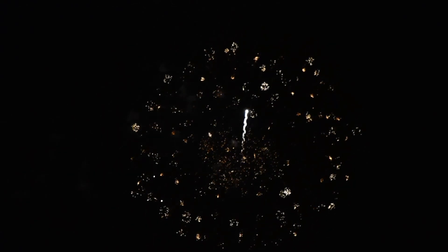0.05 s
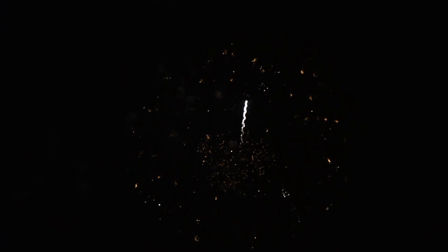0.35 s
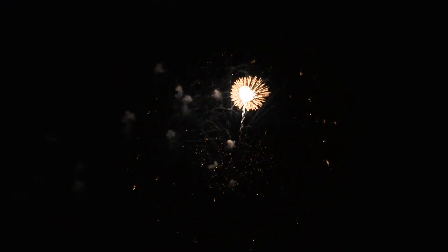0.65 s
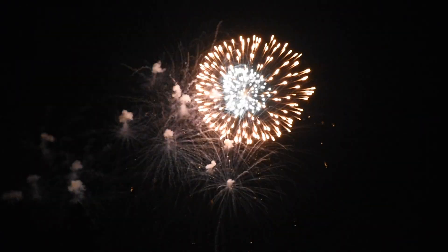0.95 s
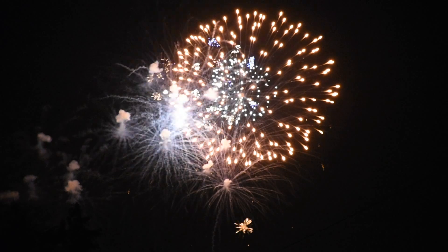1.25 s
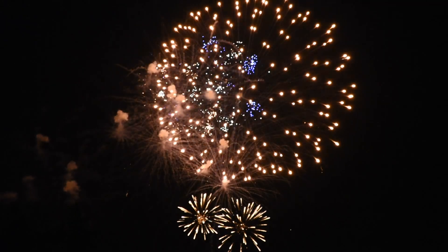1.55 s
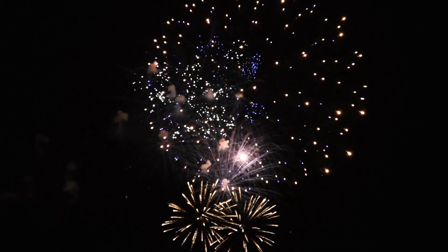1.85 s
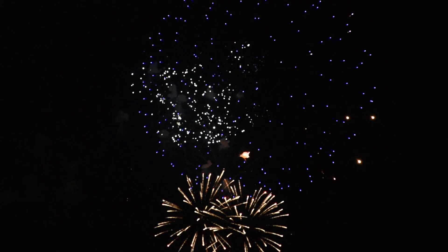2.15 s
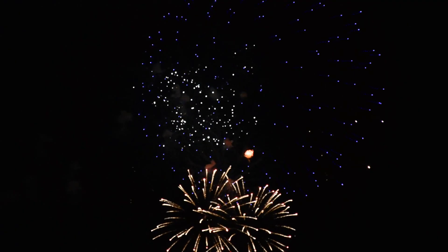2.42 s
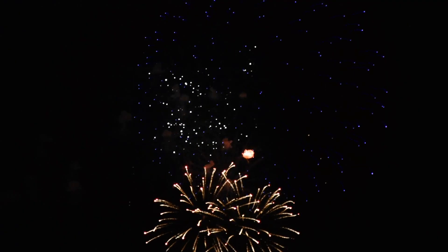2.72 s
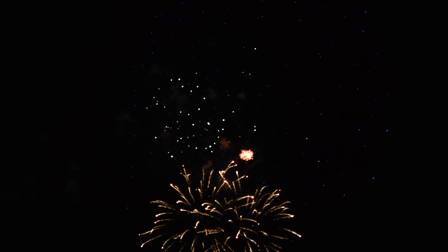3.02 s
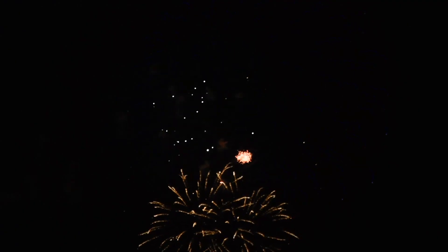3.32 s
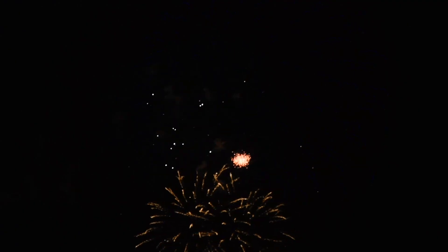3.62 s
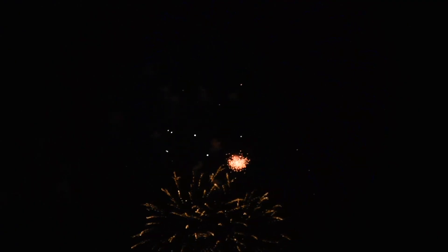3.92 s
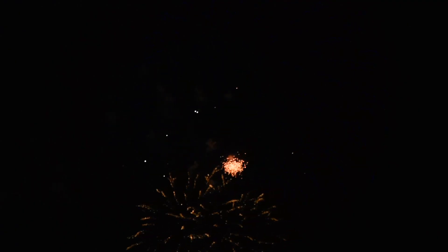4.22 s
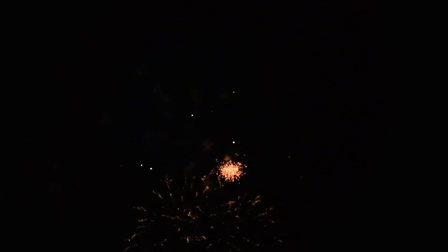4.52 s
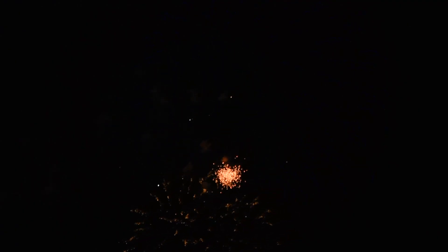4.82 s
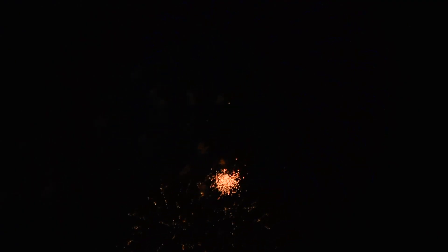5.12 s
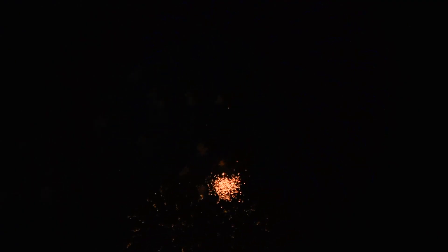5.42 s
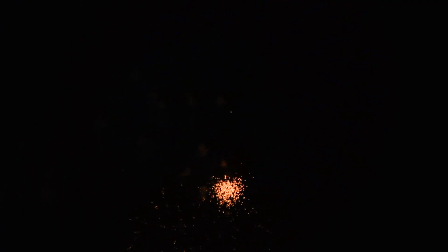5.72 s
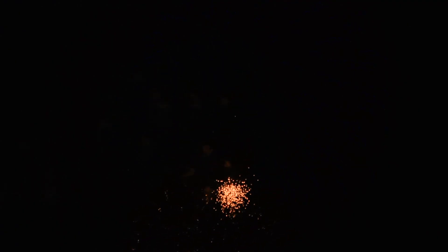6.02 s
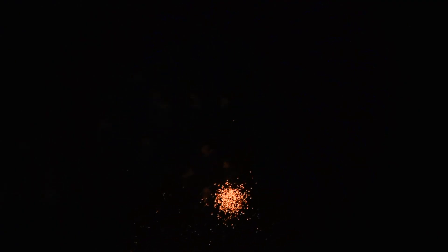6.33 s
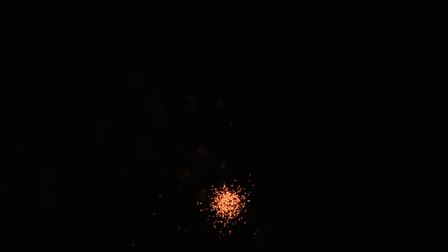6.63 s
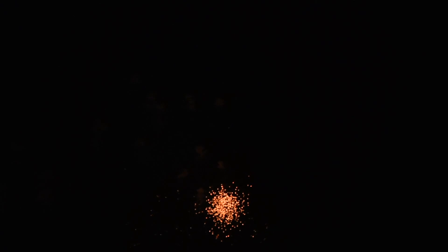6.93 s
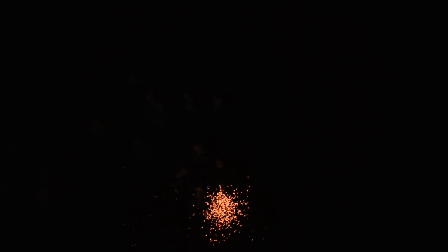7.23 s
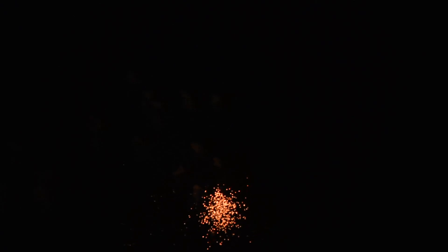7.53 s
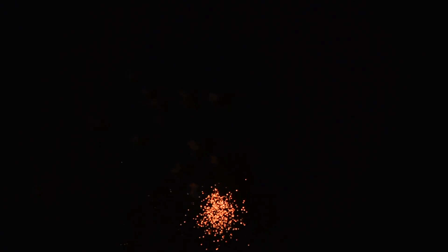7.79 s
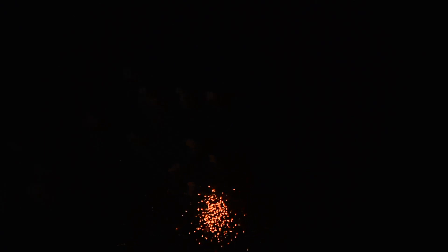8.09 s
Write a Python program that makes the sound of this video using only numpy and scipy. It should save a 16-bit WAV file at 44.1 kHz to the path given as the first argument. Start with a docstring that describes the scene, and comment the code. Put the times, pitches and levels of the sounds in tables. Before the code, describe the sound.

Fireworks go off some way away over a city at night, each blast slapping off walls, returning from buildings almost a second later and rolling away as low thunder. A hollow mortar thump at 0.3 seconds is followed by a sharp bang at 0.5 and a lighter one at 1.6. Another launch thumps at 2.2, then a soft fizz passes around 2.8. A launch and a loud burst land together at 3.8, and a further thump comes at 4.9. A strong double bang at 5.6 trails a second soft fizz. The loudest blast hits at 7.6, briefly overloading the microphone, and a rapid cluster of smaller bangs follows from 8.1 to 8.2. Underneath run a quiet, steady hum of far machinery, light microphone hiss and a very faint rasping insect that pauses from about 6 to 8 seconds.

```python
"""Fireworks over a city at night

Mortars thump and shells burst some way off. Each blast wave slaps off nearby walls, returns from
building fronts and rolls away as low thunder. The loudest bangs overload the microphones.
Underneath: far machinery hum, an insect, two soft fizzes and microphone hiss."""
import sys
import numpy as np
from scipy import signal
from scipy.fft import rfft, irfft, next_fast_len
from scipy.io import wavfile

SR = 44100
rng = np.random.default_rng(int(sys.argv[2]) if len(sys.argv) > 2 else 0)


def generate_wav(signal):
    """Clip the signal to [-1, 1] and save it as 16-bit WAV at the path in sys.argv[1]."""
    frames = np.transpose(np.atleast_2d(signal))
    scaled = np.clip(frames, -1, 1) * 32767
    pcm = np.round(scaled).astype(np.int16)
    wavfile.write(sys.argv[1], SR, pcm)


N = 364089

# far machinery: (frequency [Hz], level [dB], width [Hz])
HUM_TONES = [(350.8, -41, 13), (710, -71, 24), (3185, -75, 34)]
# insect song, one pause: (time [s], level [dB])
INSECT_LEVEL = [(0, -71), (2, -69), (5.87, -69), (5.97, -97), (7.9, -95), (8, -70)]
# microphone hiss: (frequency [Hz], relative density [dB])
HISS_SPECTRUM = [(100, -16.5), (2500, 0.5), (4000, 3), (7000, -1.5), (11000, -5.5), (15500, -12.5)]
# fizz: (frequency [Hz], relative density [dB])
FIZZ_SPECTRUM = [(1000, -16), (2300, 4), (3300, -7), (4800, -10.5), (6500, -20), (12000, -34)]
# fizzes high in the air: (time [s], length [s], level [dB])
FIZZES = [(2.746, 0.24, -51), (5.751, 0.22, -53.5)]
# thunder, bass: (frequency [Hz], relative density [dB])
BASS_SPECTRUM = [(12, -41), (25, -18.5), (45, -6.5), (70, -2.5), (105, 5), (190, 0.5), (290, -5),
                 (420, -32.5), (800, -72.5), (2000, -103.5)]
# thunder, midrange: (frequency [Hz], relative density [dB])
MIDS_SPECTRUM = [(150, -13.5), (330, -1), (480, 0.5), (720, -3.5), (850, -8.5), (1350, -12.5),
                 (1900, -22.5), (2700, -29.5), (4000, -41.5), (9000, -61)]
# decay of the roll among buildings: (frequency [Hz], T60 [s])
ROLL_T60 = [(40, 4.9), (100, 2.54), (250, 1.42), (700, 1.2), (2000, 1.01), (5000, 0.42)]
# colour of the roll: (frequency [Hz], gain [dB])
ROLL_COLOUR = [(25, -10), (45, -10), (65, 2), (110, 6.5), (220, 0.5), (400, 3.5), (1200, 4.5), (2500, 5.5),
               (6000, 13.5)]
# building fronts: (delay [s], gain [dB], cutoff [Hz], scatter [dB], boom [Hz], boom [dB])
FACADES = [(.136, -29, 250, -10.5, 91.5, 13), (0.216, -22.5, 200, -2.5, 67, 11.5),
           (0.387, -22, 5000, 3, 194, 7), (0.475, -23, 450, -9.5, 107.4, 8),
           (.603, -28, 1495, 2.5, 132, -4), (0.8381, -14.5, 8000, 3.5, 97, 5.5),
           (.889, -13.5, 301.5, -7, 107.6, 11.5)]
# nearby walls: (delay [s], gain [dB])
WALLS = [(.0062, -22.5), (.0097, -12), (0.0212, -22.5), (0.043, -14), (.062, -19)]
# street resonances: (frequency [Hz], width [Hz], gain [dB])
STREET_MODES = [(66.3, 8.7, 1.5), (167.3, 37, -4), (209, 45, -2.5), (443.6, 18, -1.5), (746, 15, -4),
                (1029, 15, -4.5), (1060, 30, -4.5), (1510, 55, -7)]
# mortar launches: (time [s], gain [dB], push [ms], cutoff [Hz], scatter [dB], roll [dB],
# knock [Hz], knock [dB])
LAUNCHES = [(.258, -5, 2.1, 1560, 1, -17.5, 453, 9.5), (2.1954, -4.5, 3.5, 2120, 1.5, -7, 570, 9),
            (3.8102, -5, 1.9, 1400, 3.5, -19, 1260, 17), (4.9332, -3, 2.3, 1600, 2, -6, 1085, 4)]
# shell bursts, plus at 7.652 s a strong low echo of the 7.58 s burst, played as a row of its own: (time [s],
# gain [dB], push [ms], cutoff [Hz], scatter [dB], roll [dB], # knock [Hz], knock [dB], near facades [dB], far
# facades [dB])
BURSTS = [ (0.5104, 2.5, 3, 2100, -1, -6.5, 1040, -8, 0, 5),
          (1.559, -3, 1.6, 1760, -4.5, -3, 724, -17, -1, -0.5),
          (3.8299, 7, 3.3, 2262, -4.5, -6, 370, 1, 1.5, 0),
          (5.6111, 3.5, 2.5, 2320, -2.5, -6, 262, 4, 3.5, -1),
          (5.6698, -5.5, 1.6, 1510, -3.5, -8.5, 1035, 9, -18, -21),
          (7.383, -14, 1.9, 218, -13, -19, 108, 19, -21, -18.5),
          (7.5809, 11, 3.15, 2430, -7, -9.5, 427, 7.5, 5.5, 0.5),
          (7.6522, -2, 5, 990, -9.5, -10.5, 86.6, 6, -8, -8),
          (8.1156, -9.5, 0.6, 2000, -0.5, -1.5, 558, 12, -7, -13),
          (8.1507, -0.5, 1.3, 1750, -7, -28, 230, 4.5, -6, -6),
          (8.1796, -1, 1.2, 1190, -18.5, -6.5, 473, 6, -6, -1),
          (8.2145, -8, 2.3, 900, 7, -9, 370.7, 7, -4, -5),
          (8.228, -2.5, 1.8, 1910, -1.5, -10.5, 441, 14, -14, -6)]


def gain_of(db):
    """Decibels to amplitude factor."""
    return 10 ** (np.asarray(db) / 20)


def unit_rms(x):
    """Scale to rms 1."""
    return x / np.sqrt(np.mean(x ** 2) + 1e-20)


def lookup(table, hz):
    """Interpolate a table over log frequency."""
    table_hz, value = np.transpose(table)
    return np.interp(np.log(hz + 1), np.log(table_hz + 1), value)


def coloured(x, spectrum):
    """Filter by a table of (frequency [Hz], gain [dB])."""
    size = next_fast_len(x.shape[-1], True)
    gain = gain_of(lookup(spectrum, np.fft.rfftfreq(size, 1 / SR)))
    return irfft(rfft(x, size) * gain, size)[..., :x.shape[-1]]


def filtered(x, hz, kind, order):
    """Causal low-pass or high-pass."""
    return signal.sosfilt(signal.butter(order, min(hz, SR / 2 - 1), kind, fs=SR, output="sos"), x)


def resonate(x, hz, width_hz):
    """Resonance, peak gain 1."""
    return signal.lfilter(*signal.iirpeak(hz, hz / width_hz, fs=SR), x)


def wander(size, per_s):
    """Slow random curve, rms 1."""
    knots = rng.standard_normal(4096)
    return unit_rms(np.interp(np.arange(size) * per_s / SR, np.arange(len(knots)), knots))


def noise_band(hz, width_hz, channels):
    """Narrowband noise, rms 1."""
    size = next_fast_len(N, True)
    bell = np.exp(-2 * ((np.fft.rfftfreq(size, 1 / SR) - hz) / width_hz) ** 2)
    return unit_rms(irfft(rfft(rng.standard_normal((channels, size))) * bell, size)[:, :N])


def add(mix, at_s, sound):
    """Mix a sound in, in place."""
    part = mix[round(at_s * SR):][:len(sound)]
    part += sound[:len(part)]


def echoes(size, per_s, spread_db):
    """Sparse reflections of random sign and strength."""
    strength = rng.choice([-1, 1], size) * gain_of(spread_db * np.clip(rng.standard_normal(size), -2, 2))
    return unit_rms(strength * (rng.random(size) < per_s / SR))


def hum_and_hiss(hiss_db=-60, whine_db=-80, pan_db=0.13):
    """Wavering tones of far machinery; hiss and thin whine of each microphone."""
    hum = sum(gain_of(db) * noise_band(hz, width_hz, channels=1) for hz, db, width_hz in HUM_TONES)
    hiss = gain_of(hiss_db) * unit_rms(coloured(rng.standard_normal((2, N)), HISS_SPECTRUM))
    whine = gain_of(whine_db) * noise_band(hz=15116, width_hz=70, channels=2)
    return (hum + hiss + whine) * gain_of([[pan_db], [-pan_db]])


def insect(first_s=0.017, period_s=0.152, step_s=0.04, stroke_s=0.05, jitter_s=0.015, uneven_db=4):
    """A bush cricket rasps in loose groups of three wing strokes."""
    strokes = np.full(N, 0.4)  # blur of others farther off
    stroke_db = [-2, 0, 0] + uneven_db * rng.standard_normal((100, 3))
    late_s = jitter_s * rng.random((100, 3))
    stroke = np.hanning(round(stroke_s * SR))
    for start_s, group_db, lag_s in zip(np.arange(first_s, N / SR, period_s), stroke_db, late_s):
        for k, db in enumerate(group_db):
            add(strokes, start_s + k * step_s + lag_s[k], gain_of(db) * stroke)
    level_db = np.interp(np.arange(N) / SR, *np.transpose(INSECT_LEVEL))
    return gain_of(level_db) * unit_rms(strokes) * noise_band(hz=9700, width_hz=1600, channels=2)


def fizzes(grain_db=3):
    """Grainy hiss that swells and dies, probably from burning stars."""
    envelope = np.zeros(N)
    for at_s, length_s, db in FIZZES:
        add(envelope, at_s, gain_of(db) * np.hanning(round(length_s * SR)))
    grains = rng.standard_normal(N) * gain_of(grain_db * wander(N, per_s=350))
    return envelope * unit_rms(coloured(grains, FIZZ_SPECTRUM))


def rumble_envelope(steady_db, swell_db, fade_db_per_s, build_s=0.15):
    """Steady bed from earlier shells, plus a swell in proportion to each burst."""
    t = np.arange(0, N, 256) / SR
    power = gain_of(steady_db) ** 2
    for at_s, gain_db, *_ in BURSTS:
        age_s = np.maximum(t - at_s, 0)
        rise = 1 - np.exp(-(age_s / build_s) ** 2)
        power = power + (rise * gain_of(gain_db + swell_db - fade_db_per_s * age_s)) ** 2
    return np.sqrt(np.interp(np.arange(N) / SR, t, power))


def thunder(bass_flutter_db=1.8, mids_flutter_db=1.13):
    """Countless late echoes merge into a rumble that swells and ebbs."""
    arrivals, flutter = rng.standard_normal(N), wander(N, per_s=18)
    bass = unit_rms(coloured(arrivals, BASS_SPECTRUM)) * gain_of(bass_flutter_db * flutter)
    mids = unit_rms(coloured(arrivals, MIDS_SPECTRUM)) * gain_of(mids_flutter_db * flutter)
    bass *= rumble_envelope(steady_db=-33, swell_db=-28.5, fade_db_per_s=6.5)
    mids *= rumble_envelope(steady_db=-40, swell_db=-37.5, fade_db_per_s=7)
    return bass + mids


def roll(rise_s=0.019, clump_db=2):
    """City impulse response: echoes arrive in clumps, block after block; treble dies first."""
    t = np.arange(2 * SR) / SR
    taps = echoes(len(t), per_s=1300, spread_db=-2) * gain_of(clump_db * wander(len(t), per_s=19))
    hz, age_s, spectra = signal.stft(coloured(taps, ROLL_COLOUR), SR, nperseg=1024)
    decay = gain_of(-60 * age_s / lookup(ROLL_T60, hz)[:, None])
    tail = signal.istft(spectra * decay, SR, nperseg=1024)[1][:len(t)]
    return tail * (1 - np.exp(-t / rise_s)) / np.sqrt(SR * 0.13)


def street_scatter(t60_s=0.13, rise_s=0.00085, treble_db=4):
    """Street impulse response: a brief smear; short waves scatter most."""
    t = np.arange(SR // 4) / SR
    taps = echoes(len(t), per_s=2600, spread_db=-1)
    taps = coloured(taps, [(80, -3), (500, 0.0038), (2500, treble_db)])
    taps = taps * (1 - np.exp(-t / rise_s)) * gain_of(-60 * t / t60_s)
    return gain_of(treble_db) * taps / np.linalg.norm(taps)


def facades(near_db, far_db, far_from_s=0.7, boom_q=7):
    """One late echo per building front: smeared, dulled, with a low boom."""
    paths, scatter = np.zeros(SR * 5 // 4), street_scatter()
    for delay_s, db, cutoff_hz, scatter_db, boom_hz, boom_db in FACADES:
        echo = gain_of(scatter_db) * scatter
        echo[0] += 1  # mirror reflection
        range_db = near_db if delay_s < far_from_s else far_db
        echo = gain_of(db + range_db) * filtered(echo, cutoff_hz, "low", order=2)
        add(paths, delay_s, echo + gain_of(boom_db) * resonate(echo, boom_hz, boom_hz / boom_q))
    return paths


def blast(push_ms, cutoff_hz, knock_hz, knock_db, front_hz=1000, low_cut_hz=33, knock_q=10):
    """Sudden push, longer suction, rounded by the air. Returns street-coloured wave and hollow knock."""
    u = np.arange(8192) / SR * 1000 / push_ms  # time in push lengths
    wave = filtered((1 - u) * np.exp(-u), front_hz, "low", order=1)
    wave = filtered(wave, cutoff_hz, "low", order=4)
    wave = filtered(wave, low_cut_hz, "high", order=2)
    knock = gain_of(knock_db) * resonate(wave, knock_hz, knock_hz / knock_q)
    ring = sum(gain_of(db) * resonate(wave, hz, width_hz) for hz, width_hz, db in STREET_MODES)
    return wave + ring, knock


def bang(tail, gain_db, push_ms, cutoff_hz, scatter_db, roll_db, knock_hz, knock_db,
         near_facade_db, far_facade_db, trim_db=2, city_knock_db=-9):
    """One blast over all paths: direct, street, walls, facades, roll."""
    wave, knock = blast(push_ms, cutoff_hz, knock_hz, knock_db)
    near_paths = gain_of(scatter_db) * street_scatter()
    near_paths[0] += 1  # direct path
    for delay_s, wall_db in WALLS:
        add(near_paths, delay_s, gain_of([wall_db]))
    city_paths = gain_of(roll_db) * tail
    add(city_paths, 0, facades(near_facade_db, far_facade_db))
    sound = signal.fftconvolve(wave + gain_of(city_knock_db) * knock, city_paths)
    add(sound, 0, signal.fftconvolve(wave + knock, near_paths))
    return gain_of(gain_db + trim_db) * sound


def mortars(tube_db=-1, leak_db=-17, leak_lead_s=0.00488, heave_db=-16, heave_at_s=0.017, heave_s=0.0057):
    """Each launch rings its tube; some gas leaks ahead, the rest follows as one slow push and pull."""
    out, tail = np.zeros(N), roll()
    u = (np.arange(SR // 10) / SR - heave_at_s) / heave_s
    heave = -gain_of(heave_db) * u * np.exp((1 - u ** 2) / 2)
    for at_s, *launch in LAUNCHES:
        thump = bang(tail, *launch, near_facade_db=-2.5, far_facade_db=-3.5)
        leak = gain_of(leak_db) * filtered(thump, 400, "high", order=1)
        tube = gain_of(tube_db) * resonate(thump, hz=155, width_hz=35)
        add(out, at_s - leak_lead_s, leak)
        add(out, at_s, thump + tube)
        add(out, at_s, heave)
    return out


def shells(roll_count=6):
    """Bursts in the sky (and one low echo of the biggest, played alike), each trailing off in one of six
    rolling city echoes."""
    out, tails = np.zeros(N), [roll() for _ in range(roll_count)]
    for k, (at_s, *burst) in enumerate(BURSTS):
        add(out, at_s, bang(tails[k % roll_count], *burst))
    return out


def scene(side_db=-30):
    """Two close microphones, nearly alike; sound from the sides differs a little in the treble."""
    sky = shells() + mortars() + thunder() + fizzes()
    side = gain_of(side_db) * signal.oaconvolve(sky, street_scatter())[:N]
    side = coloured(side, [(60, -1), (150, -2), (300, -6), (1000, -3), (3000, 13.5)])
    # left takes more bass
    side += coloured(sky, [(25, -17.5), (70, -22.5), (130, -28), (250, -45), (500, -23.5), (1200, -36.5)])
    return np.array([sky + side, sky - side]) + hum_and_hiss() + insect()


def record(dry, knee=16, cutoff_hz=15850):
    """Microphone overload flattens the loudest blasts, short knee; then the band limit."""
    clipped = dry / (1 + abs(dry) ** knee) ** (1 / knee)
    low_pass = signal.firwin(511, cutoff_hz, window=("kaiser", 9), fs=SR)
    return signal.oaconvolve(clipped, low_pass[None], "same")


dry = scene()
out = record(dry)
generate_wav(out)
```